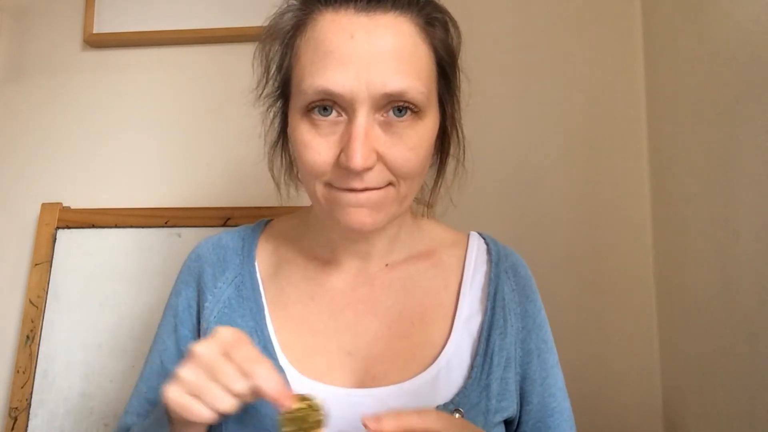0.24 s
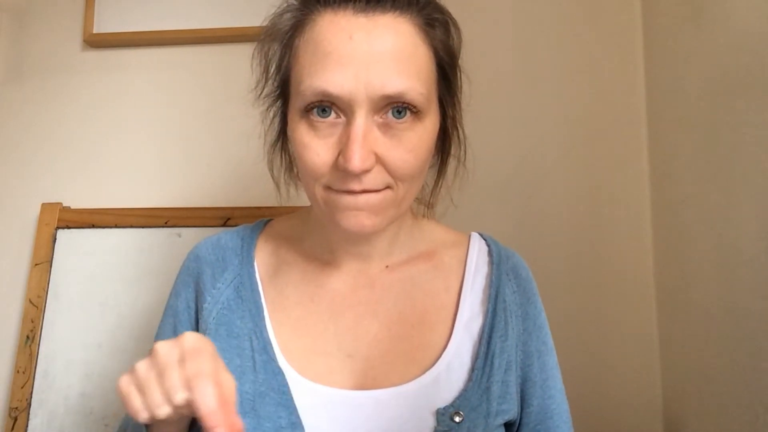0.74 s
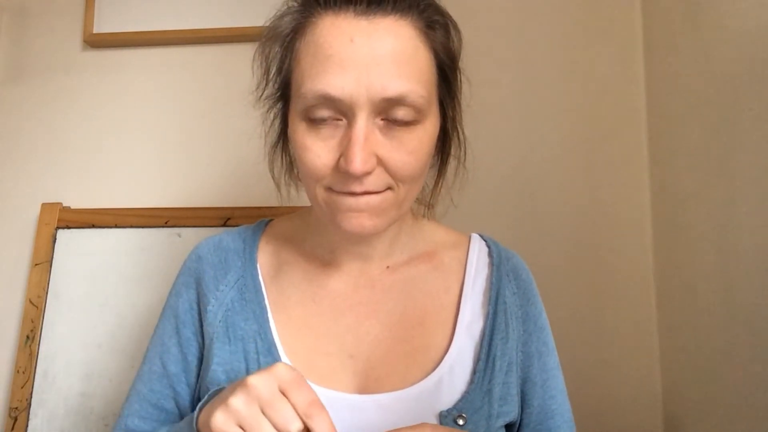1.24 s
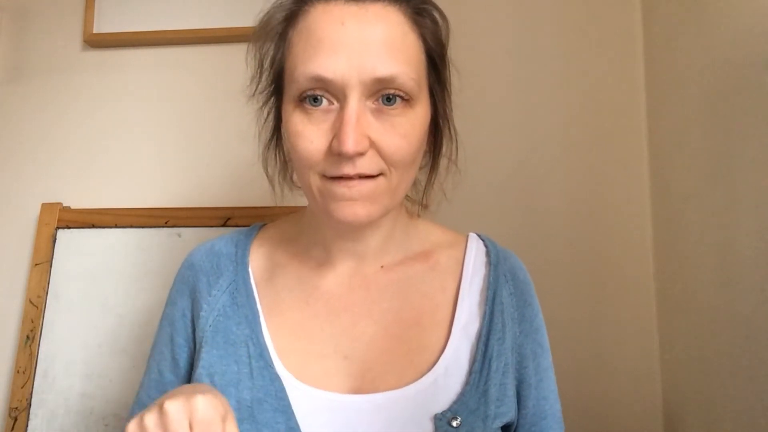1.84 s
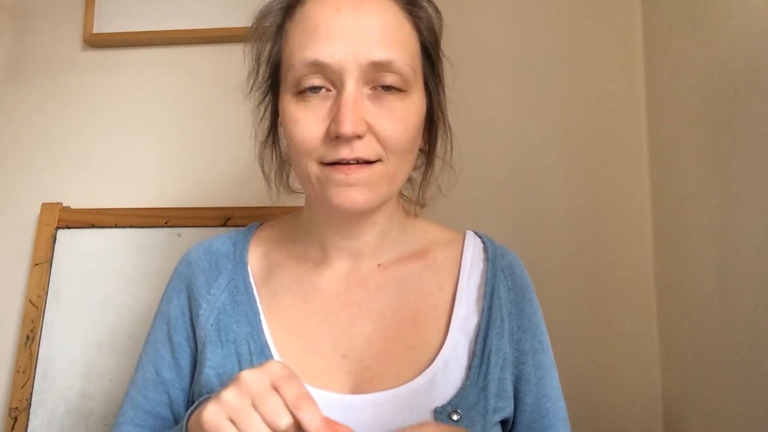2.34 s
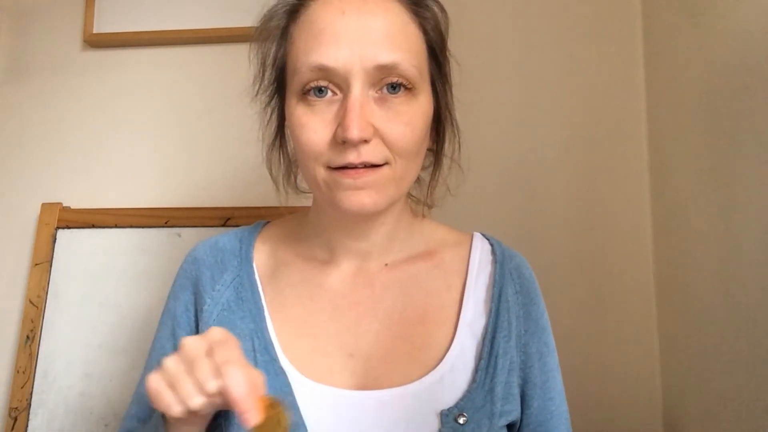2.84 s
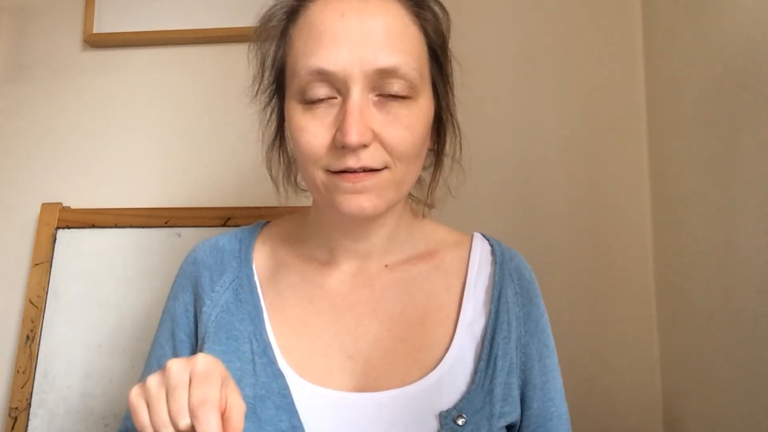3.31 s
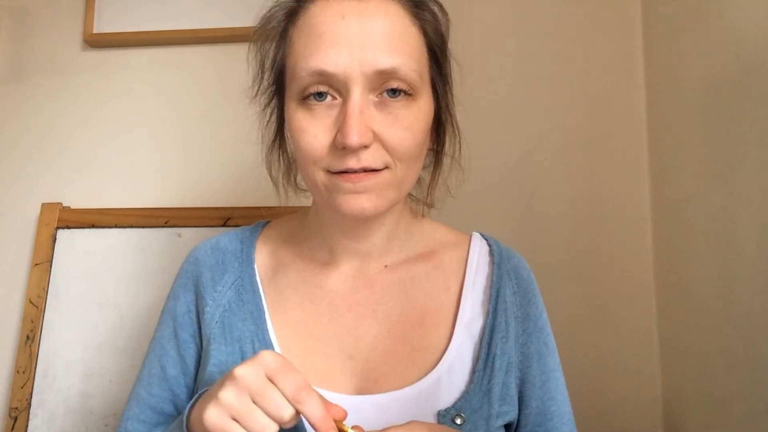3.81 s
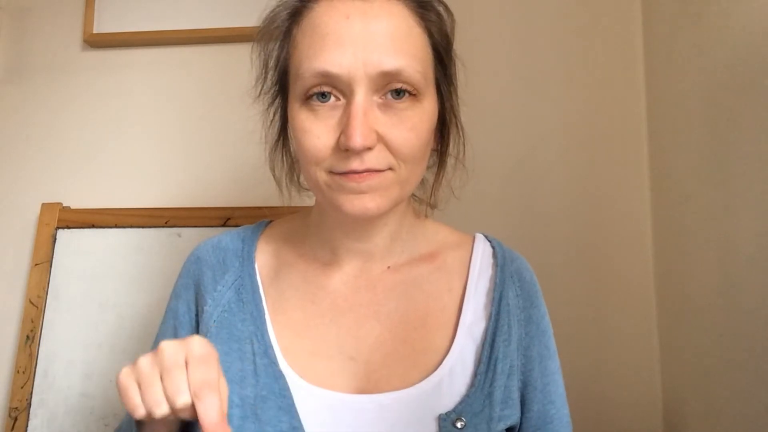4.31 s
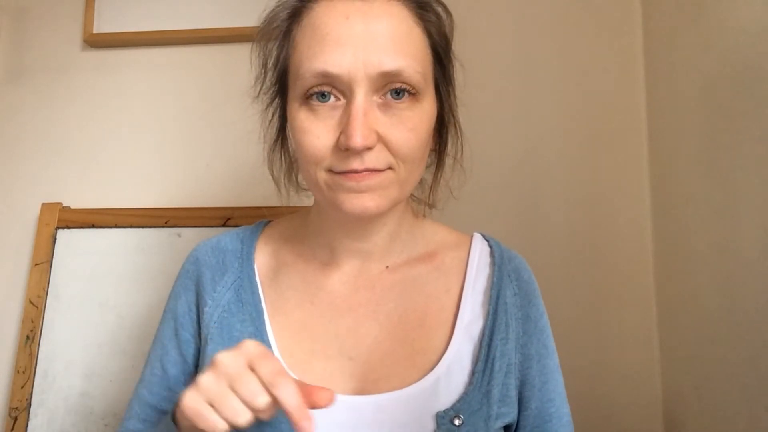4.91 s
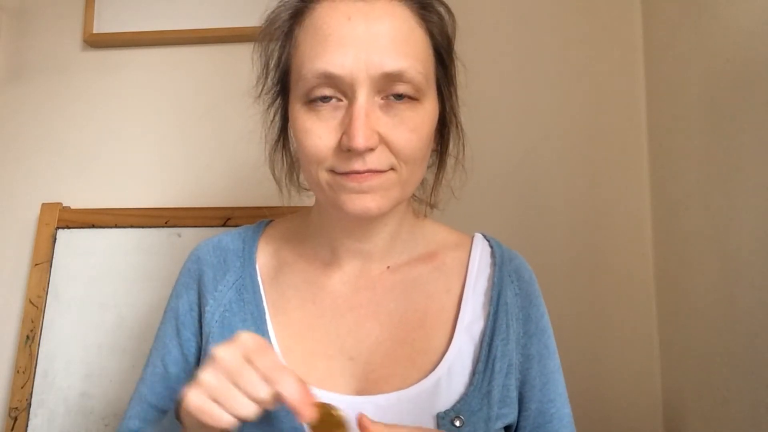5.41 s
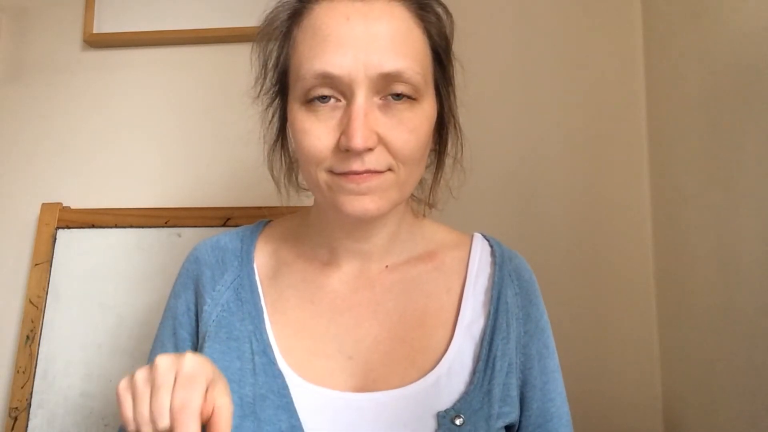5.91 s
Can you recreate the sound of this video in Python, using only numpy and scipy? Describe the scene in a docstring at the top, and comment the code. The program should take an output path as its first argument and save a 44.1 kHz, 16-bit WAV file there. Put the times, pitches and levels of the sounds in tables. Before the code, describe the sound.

Close view of small metal coins dropped singly into a plastic tub in a quiet, small room. Each gives a hollow plastic knock with a sharp bright tick, bounces, then rattles quickly to rest with a thin metallic ring. Five drops come at uneven gaps of a little over a second. Faint hiss and low distant traffic fill the pauses.

```python
"""Small metal toy coins drop one by one into a plastic tub in a quiet room: each knocks, bounces, rattles to rest.
Tub knocks and long metal rings are sums of decaying modes; ticks and shimmer are dense crowds of modes.
One echo and a diffuse tail set knocks, ticks and shimmer in the room; a coin in the hand rings at the start.
Under it lie shaped-noise hiss, a far engine (drifting sine) and traffic rumble (noise) with passing vehicles."""
import sys
import numpy as np
from scipy import signal
from scipy.fft import rfft, irfft, next_fast_len
from scipy.io import wavfile

SR = 44100
rng = np.random.default_rng(int(sys.argv[2]) if len(sys.argv) > 2 else 0)


def log_audio(samples):
    """Write samples as a 16-bit WAV file to the path given in sys.argv[1]."""
    # one column per channel
    frames = np.atleast_2d(samples).T
    # limit to full scale, then quantise
    limited = np.clip(frames, -1, 1)
    pcm = np.round(limited * 32767).astype(np.int16)
    wavfile.write(sys.argv[1], SR, pcm)


N = 271215

CUTOFF_HZ = 16200
AGE = np.arange(int(1.2 * SR)) / SR   # s since a touch


def from_db(db):
    """Decibels to amplitude gain."""
    return 10 ** (np.asarray(db) / 20)


def rms_one(x):
    """Scale to rms 1."""
    return x / np.sqrt(np.mean(x ** 2) + 1e-20)


def at_hz(points, hz):
    """Interpolate a table on a log-frequency axis."""
    known_hz, values = np.transpose(points)
    return np.interp(np.log(np.maximum(hz, 1)), np.log(known_hz), values)


def dying(t60_s):
    """Exponential decay, 60 dB in t60_s."""
    return np.exp(-np.log(1000) * AGE / t60_s)


def noise(spectrum, size):
    """Steady Gaussian noise of the given colour, rms 1."""
    padded = next_fast_len(size)
    hz = np.fft.rfftfreq(padded, 1 / SR)
    white = rfft(rng.standard_normal(padded))
    coloured = irfft(white * from_db(at_hz(spectrum, hz)), padded)
    return rms_one(coloured[:size])


def add(track, s, sound):
    """Mix a sound in from time s, which may lie before the start."""
    start = round(s * SR)
    part = sound[max(-start, 0):max(N - start, 0)]
    track[max(start, 0):max(start, 0) + len(part)] += part


def play(sounds, times_s, levels_db):
    """Put each touch's sound at its time and level."""
    track = np.zeros(N)
    for sound, s, db in zip(sounds, times_s, levels_db):
        add(track, s, from_db(db) * sound)
    return track


def hiss():
    """Steady faint noise, falling towards the treble."""
    # hiss spectrum: f/Hz, relative density/dB
    hiss_spectrum = [(180, -21), (300, -8.5), (713, -12), (870, -13.5), (961, -14), (1480, -16),
                     (2000, -17.5), (13100, -26.5), (16000, -39)]
    return from_db(-76) * noise(hiss_spectrum, size=N)


def far_engine():
    """An engine idling far off: a sine near 40 Hz, slowly drifting in pitch and level."""
    idle_hz, wander_hz, gain_db = 40, 0.28, 2
    # drone level: t/s, level before gain_db/dB
    drone_levels = [(0.0, -77.5), (0.68, -75), (1.32, -63), (2.53, -59), (2.93, -72.5), (5.89, -87),
                    (6.15, -78.5)]
    now = np.arange(N) / SR
    s, level_db = np.transpose(drone_levels)
    level = from_db(gain_db + np.interp(now, s, level_db))
    engine_hz = idle_hz + wander_hz * np.interp(now, s, rng.standard_normal(len(s)))
    tone = np.sin(2 * np.pi * np.cumsum(engine_hz) / SR)
    return level * rms_one(tone)


def traffic():
    """Low rumble; a passing vehicle's power falls with distance squared."""
    steady_db = -70
    # rumble spectrum: f/Hz, relative density/dB
    rumble_spectrum = [(20, -21.5), (38, -12), (58, 3.5), (90, -1), (160, 0.5), (240, -13), (400, -23),
                       (800, -42.5), (2000, -65.5)]
    # vehicles going by: t nearest/s, time to half power/s, level nearest/dB
    passes = [(3.85, .15, -63.5), (4.949, .4, -56.5)]
    now = np.arange(N) / SR
    power = from_db(steady_db) ** 2
    for near_s, half_s, db in passes:
        power = power + from_db(db) ** 2 / (1 + ((now - near_s) / half_s) ** 2)
    return np.sqrt(power) * noise(rumble_spectrum, size=N)


def room(x, echo_s, echo_db, tail_db, build_s):
    """Direct sound, one strong echo off a near wall, and a diffuse noise tail with its own decay per band."""
    # diffuse tail bands: centre f/Hz, relative level/dB, t60/s
    tail_bands = [(100, -5.5, 0.06), (300, -1.5, 0.29), (750, 0, .25), (2060, 2, 0.23), (4960, -5, 0.36),
                  (10000, 9, 0.15), (15600, 5, 0.063)]
    white = rfft(rng.standard_normal(len(AGE)))
    hz = np.fft.rfftfreq(len(AGE), 1 / SR)
    tail = np.zeros(len(AGE))
    for centre_hz, db, t60_s in tail_bands:
        band = at_hz([(f, float(f == centre_hz)) for f, *_ in tail_bands], hz)   # triangle on log f
        tail += from_db(db) * irfft(white * band, len(AGE)) * dying(t60_s)
    tail *= 1 - np.exp(-AGE / build_s)
    response = from_db(tail_db) * tail / np.sqrt(np.sum(tail ** 2))
    response[round(echo_s * SR)] += from_db(echo_db)
    return x + signal.fftconvolve(x, response)[:N]


def picked_coin():
    """Faint modes of a coin just picked off the stack, still ringing in the hand at the start."""
    # picked coin's modes: f/Hz, relative level/dB, t60/s
    picked_modes = [(1170, -1.5, 0.96), (1230, -2, 0.6), (1631, -7.5, 0.98), (2136, -1, 0.63),
                    (2390, -6, 2.1), (2643, -5.5, 1.0), (2710, -5, 0.56)]
    ring = np.zeros(len(AGE))
    for hz, db, t60_s in picked_modes:
        ring += from_db(db) * dying(t60_s) * np.sin(2 * np.pi * (hz * AGE + rng.random()))
    return play([ring], [0], [-68])


def rattle(start_s, length_s, knock_db, ring_db, count):
    """A tumbling or settling coin: touches, on average ever closer and weaker, in the columns of the hits."""
    hop_keeps, hop_jitter = .85, .2   # share of the last hop's time; log spread
    hop_loss_db, hop_spread_db = 3.19, 1
    tick_re_knock_db, hardness = -11.5, -4.5
    hop = np.arange(count)
    timing, *strength = rng.standard_normal((count, 4)).T
    flight = hop_keeps ** hop * np.exp(hop_jitter * timing)
    s = start_s + length_s * (np.cumsum(flight) - flight) / flight[:-1].sum()
    knock, tick, ring = hop_spread_db * np.array(strength) - hop_loss_db * hop
    tick_db = knock_db + tick_re_knock_db + tick
    return np.transpose([s, knock_db + knock, tick_db, ring_db + ring, np.full(count, hardness)])


def all_touches():
    """Every touch of a coin: landings and big bounces, then the rattles."""
    # landings, big bounces: t/s, relative knock, tick and ring levels/dB, hardness (tick tilt)/dB per octave
    hits = [(.793, -17, -28, -43, 2.5), (.8436, -28, -37, -38.5, -0.5), (.891, -18.5, -28.5, -31, 5),
            (.912, -21.5, -30.5, -39, 1), (1.003, -26, -55, -34, 1), (1.092, -33, -61, -38.5, -3),
            (1.167, -41.5, -70, -65.5, 0), (1.9754, -18, -26, -53.5, 0), (2.038, -28, -50, -43.5, -5),
            (2.101, -32, -40, -70, -3.5), (2.208, -47, -53, -38.5, -1.5), (2.266, -31, -48, -42.5, -10),
            (2.272, -40, -33.5, -36.5, 0), (3.4408, -29.5, -39.5, -31.5, -2.5),
            (3.4675, -18.5, -23, -41, -3), (3.505, -29.5, -34.5, -28, 2.5),
            (3.564, -28.5, -32.5, -30.5, -3.5), (3.597, -21, -35, -46.5, 0.5),
            (4.8013, -18, -22, -52, -2.5), (4.873, -27, -36.5, -52, -2), (4.974, -50.5, -79, -82, -7),
            (5.0155, -36.5, -34.5, -30, -1), (6.0046, -22, -31.5, -35, -3.5), (6.038, -37, -39, -56, 2),
            (6.0655, -27.5, -33.5, -28.5, 1), (6.104, -28, -31.5, -30, -1)]
    # rattles: start t/s, first to last touch/s, first relative knock level/dB, first relative ring level/dB
    rattles = [(0.946, .13, -27, -34.5), (2.018, .11, -34, -58), (2.302, 0.053, -41, -51),
               (3.526, .13, -24.5, -35.5), (4.886, 0.082, -56, -64), (5.047, 0.056, -33, -45),
               (6.047, 0.16, -25, -35.5)]
    return np.vstack([hits] + [rattle(*row, count=6) for row in rattles])


def struck(touches, modes, spread_db, phase_spread_rad, lift_db=0):
    """One modal ring per touch: each lands on another spot and so weights the modes differently."""
    shape = (len(touches), len(modes))
    gains = from_db(lift_db + spread_db * rng.standard_normal(shape))
    weights = gains * np.exp(1j * phase_spread_rad * rng.standard_normal(shape))
    rings = np.array([from_db(db) * dying(t60_s) * np.exp(2j * np.pi * hz * AGE)
                      for hz, db, t60_s in modes])
    return (weights @ rings).imag


def tub(touches):
    """Hollow knocks of the plastic; a flat landing drives the low modes harder than an edge does."""
    # plastic tub modes: f/Hz, relative level/dB, t60/s
    tub_modes = [(146, -23.5, 0.069), (262.4, -13.5, 0.11), (356.5, -15.5, 0.12), (406, -6, .05),
                 (534.8, -8, 0.034), (621, -2.5, 0.035), (707.3, -0.5, 0.044), (780, 0.5, 0.03),
                 (991, -4, 0.039), (1137, -13.5, .03), (1400, -14, 0.048), (1451, -16.5, 0.07),
                 (2037, -13.5, 0.031), (2165, -18, 0.031), (2620, -13, 0.015)]
    s, knock_db, _, _, hardness = touches.T
    mode_hz = np.array(tub_modes)[:, 0]
    tilt_db = 0.61 * hardness[:, None] * np.log2(mode_hz / np.median(mode_hz))
    knocks = from_db(0.5) * struck(touches, tub_modes, spread_db=1.5, phase_spread_rad=0.71, lift_db=tilt_db)
    knocks *= 1 - dying(0.0058)   # the plastic gives way before it swings
    no_bass = signal.butter(2, 70, "high", fs=SR, output="sos")   # so small a body radiates no deep bass
    return signal.sosfilt(no_bass, play(knocks, s, knock_db))


def coin_lift(times_s, hz):
    """Per touch and frequency, the dB by which the falling coin favours or weakens that pitch."""
    # each coin's own range: let go t/s, centre f/Hz, width/octaves, lift at centre/dB
    coin_ranges = [(.7, 4130, .04, 9.5), (1.9, 5010, .25, 7.5), (3.4, 4850, 0.23, -1.5),
                   (4.7, 4330, 0.42, 6), (5.9, 3600, 0.055, 2)]
    starts_s, centre_hz, width_oct, lift_db = np.transpose(coin_ranges)
    coin = np.searchsorted(starts_s, times_s)[:, None] - 1
    off_centre = np.log2(hz / centre_hz[coin]) / width_oct[coin]
    return lift_db[coin] * np.exp(-.5 * off_centre ** 2)


def bursts(touches, spectrum, t60_s, patchy_db, coin_share, count):
    """One burst per touch from a crowd of close modes, coloured by the coin; a hard edge is brighter."""
    hz = np.fft.rfftfreq(len(AGE), 1 / SR)
    low, high = spectrum[0][0], min(spectrum[-1][0], CUTOFF_HZ)
    mode_hz = low + (high - low) * (np.arange(count) + rng.random(count)) / count
    bins = np.searchsorted(hz, mode_hz)
    regions_hz = np.geomspace(low, high, 20)
    lines = np.zeros((len(touches), len(hz)), complex)
    for row, (*_, hardness), coin_db in zip(lines, touches, coin_lift(touches[:, 0], mode_hz)):
        # each spot favours other modes
        spot_db = np.interp(mode_hz, regions_hz, patchy_db * rng.standard_normal(len(regions_hz)))
        tilt_db = hardness * np.log2(mode_hz / low)
        mode_db = at_hz(spectrum, mode_hz) + spot_db + coin_share * coin_db + tilt_db
        row[bins] = from_db(mode_db) * np.exp(2j * np.pi * rng.random(count))
    waves = irfft(lines, len(AGE))
    return np.array([rms_one(wave) for wave in waves]) * dying(t60_s)


def chatter(touches, depth_db, per_s):
    """A landing coin rocks from edge to edge, so its tick dies in uneven steps."""
    steps = rng.standard_normal((len(touches), 1000))
    wobble = np.array([np.interp(AGE * per_s, np.arange(len(row)), row) for row in steps])
    return from_db(depth_db * wobble)


def coin_ticks(touches):
    """The hard tick of a coin's edge: dense, short-lived high modes."""
    # tick spectrum: f/Hz, relative density/dB
    tick_spectrum = [(1000, -1.5), (2000, -3.5), (2900, -4.5), (3700, 2.5), (4500, -2), (5300, 1),
                     (7200, -3), (9500, -8), (12000, -13.5), (16000, -16.5)]
    ticks = bursts(touches, tick_spectrum, t60_s=0.057, patchy_db=3.0, coin_share=.4, count=400)
    ticks *= from_db(-1.5) * chatter(touches, depth_db=3.0, per_s=400)
    return play(ticks, touches[:, 0], touches[:, 2])


def coin_shimmer(touches):
    """The weak overtones of the coins: dense modes that outlast the tick."""
    # shimmer spectrum: f/Hz, relative density/dB
    shimmer_spectrum = [(1500, -15), (2800, -6), (3500, 6.5), (4400, -5.5), (5100, 6.5), (5900, -9.5),
                        (7300, -7), (9000, -9.5), (12000, -13), (16000, -22)]
    shimmer = bursts(touches, shimmer_spectrum, t60_s=0.34, patchy_db=3.0, coin_share=.3, count=400)
    return play(from_db(-12.5) * shimmer, touches[:, 0], touches[:, 3])


def coin_rings(touches):
    """The long clear ring of the metal: separate modes, weighted by the coin's own range."""
    # ringing metal modes: f/Hz, relative level/dB, t60/s
    metal_modes = [(680, 0.5, 0.43), (772, -1, 0.35), (928, -6, 0.47), (1005, -2.5, 0.6), (1185, -13, 0.56),
                   (1220, -8, 0.51), (1572, -20, 0.79), (1640, -25.5, 0.48), (2040, -24.5, 0.43),
                   (2070, -25.5, 0.82), (2190, -23, 0.71), (2370, -29.5, 1), (2690, -27, 1),
                   (2640, -28, 0.87), (3440, -12.5, .33), (3410, -12.5, 0.6), (3530, -6, .3),
                   (3595, -11, 0.53), (3600, -19.5, .32), (4070, -19, 0.39), (4050, -21.5, 0.33),
                   (4080, -16.5, 0.6), (4230, -20, 0.26), (4330, -15.5, 0.38), (4710, -22, .55),
                   (4940, -20, 0.48), (4850, -13, 0.19), (5050, -13.5, 0.44), (5570, -17, .3),
                   (6309, -18.5, 0.33), (7224, -16, .29)]
    s = touches[:, 0]
    lift_db = coin_lift(s, np.array(metal_modes)[:, 0])
    rings = struck(touches, metal_modes, spread_db=4.5, phase_spread_rad=2.3, lift_db=lift_db)
    return play(from_db(-13.5) * rings, s, touches[:, 3])


def scene():
    """Coins and tub over the background, one channel; the long rings bypass the room."""
    background = hiss() + far_engine() + traffic()
    touches = all_touches()
    clatter = tub(touches) + coin_ticks(touches) + coin_shimmer(touches)
    clatter = room(clatter, echo_s=.0063, echo_db=-11.5, tail_db=-3.5, build_s=0.002)
    return (background + picked_coin() + clatter + coin_rings(touches))[None]


def record(dry):
    """The recorder cuts the top steeply: elliptic low-pass."""
    return signal.sosfilt(signal.ellip(10, .1, 80, CUTOFF_HZ, fs=SR, output="sos"), dry)


dry = scene()
out = record(dry)
log_audio(out)
```